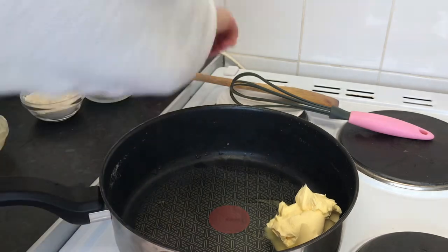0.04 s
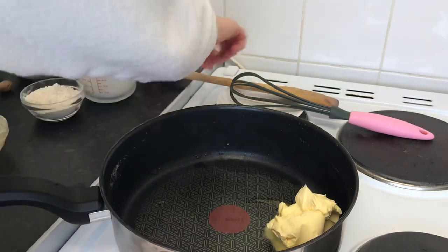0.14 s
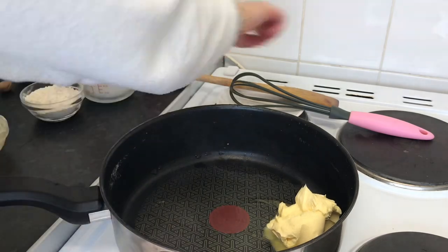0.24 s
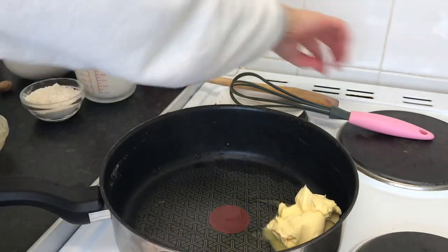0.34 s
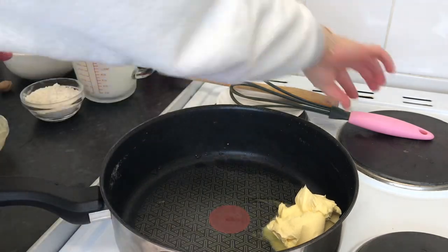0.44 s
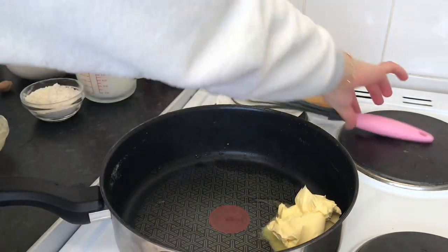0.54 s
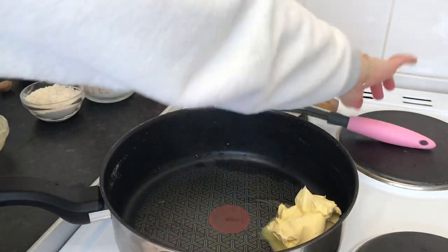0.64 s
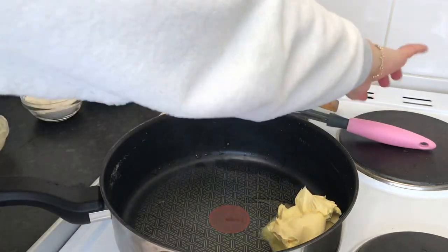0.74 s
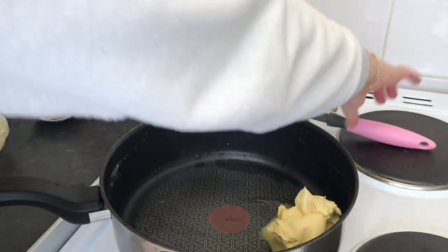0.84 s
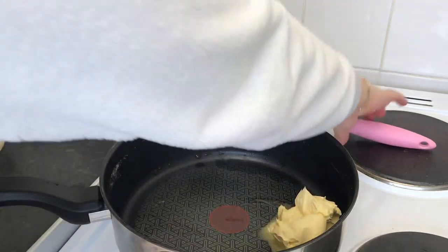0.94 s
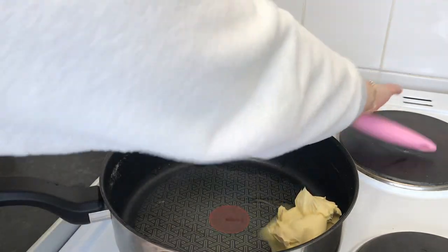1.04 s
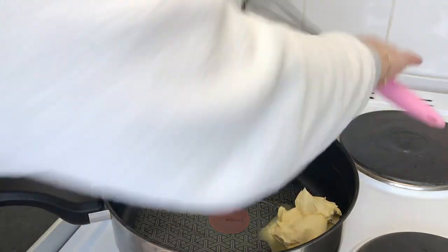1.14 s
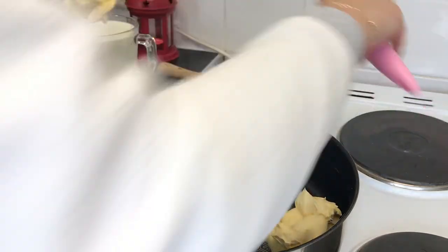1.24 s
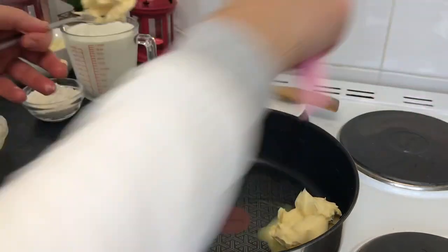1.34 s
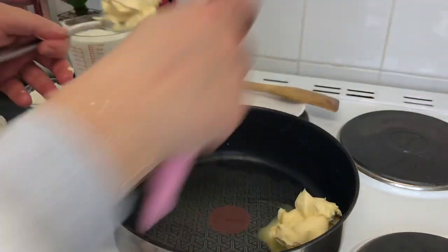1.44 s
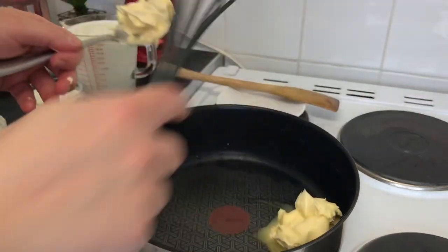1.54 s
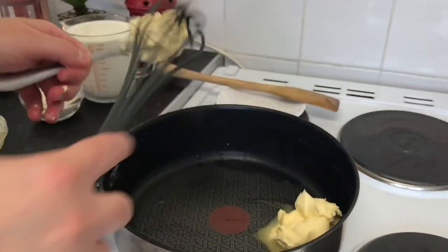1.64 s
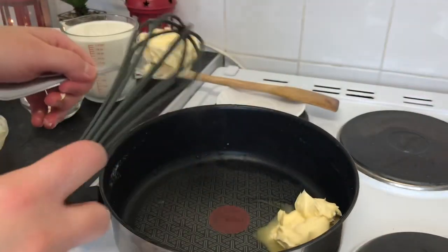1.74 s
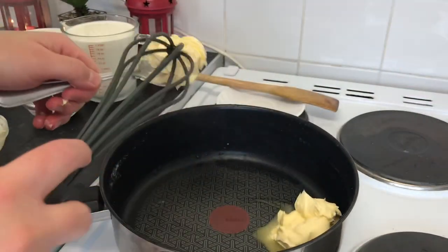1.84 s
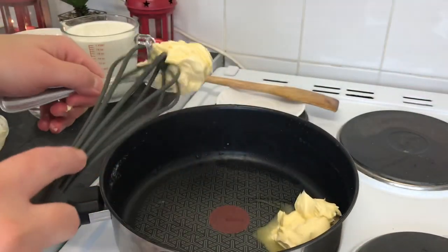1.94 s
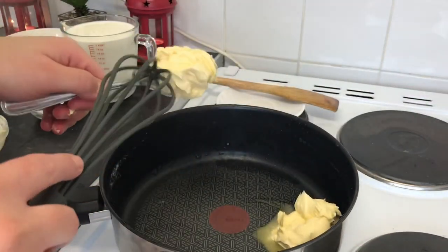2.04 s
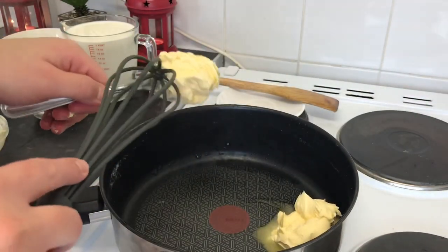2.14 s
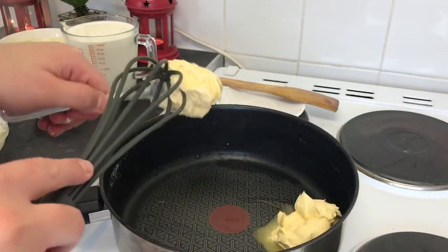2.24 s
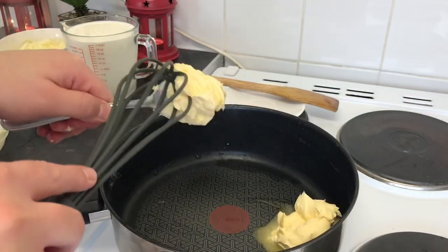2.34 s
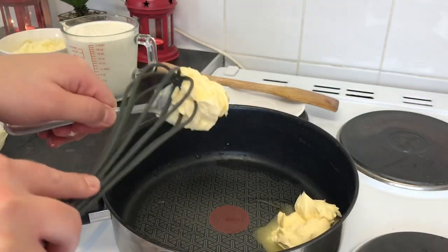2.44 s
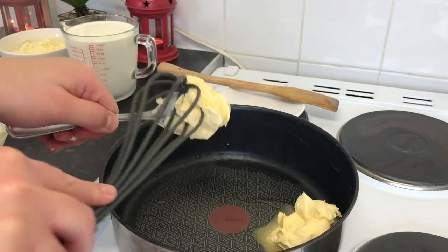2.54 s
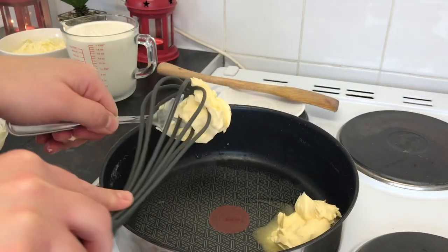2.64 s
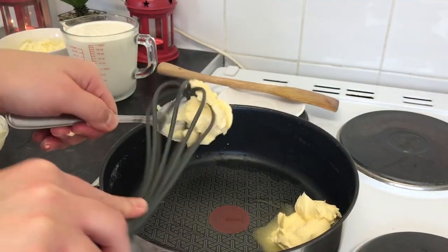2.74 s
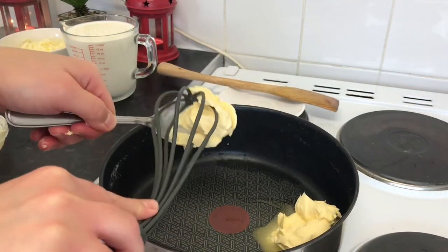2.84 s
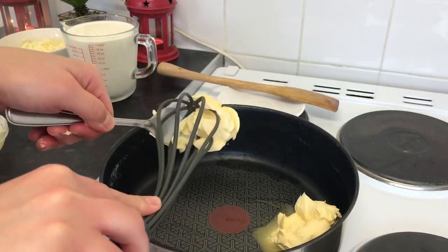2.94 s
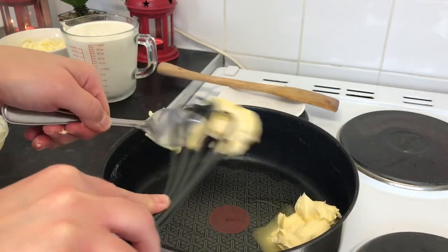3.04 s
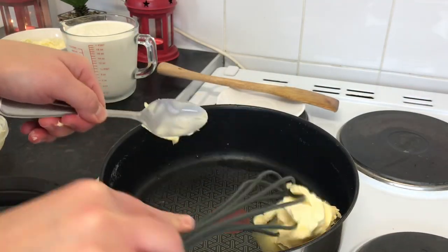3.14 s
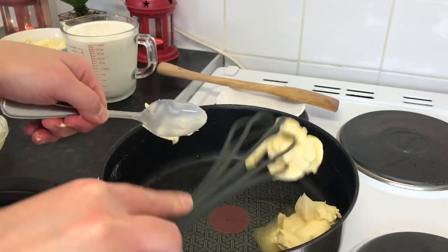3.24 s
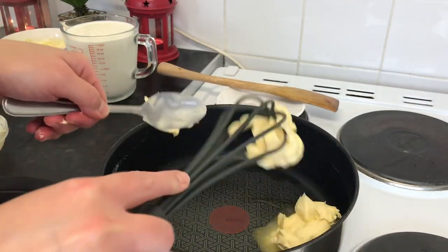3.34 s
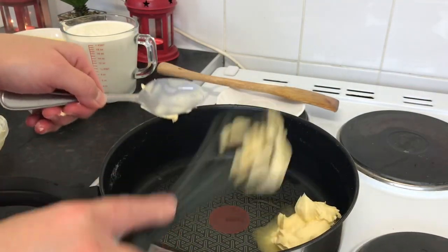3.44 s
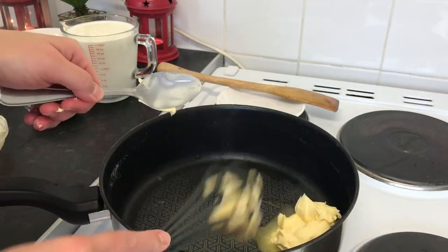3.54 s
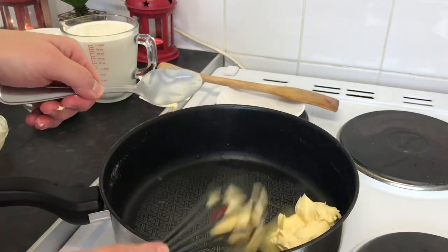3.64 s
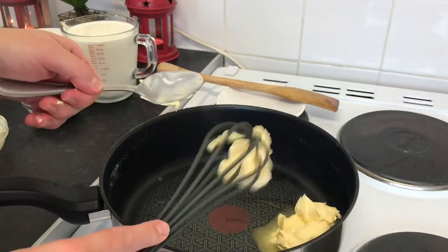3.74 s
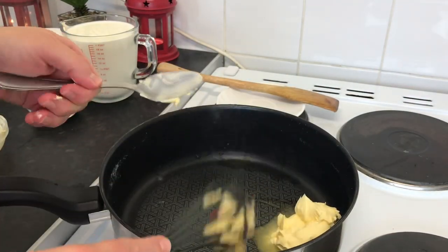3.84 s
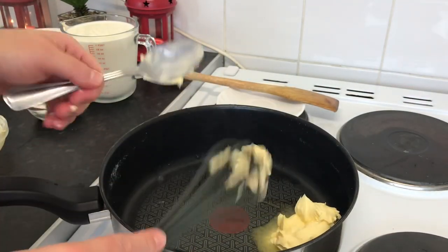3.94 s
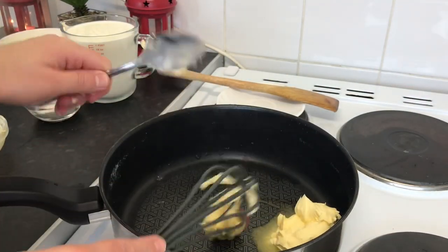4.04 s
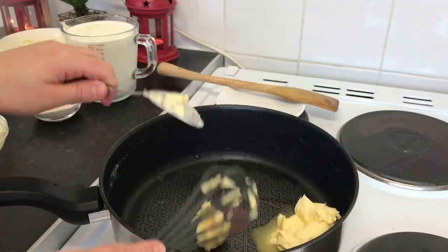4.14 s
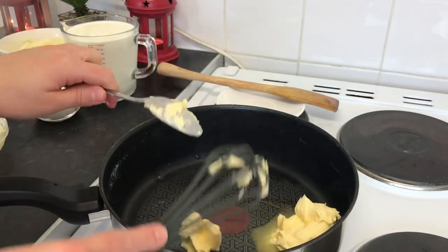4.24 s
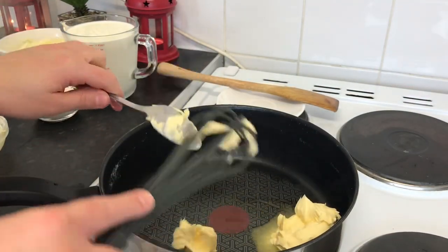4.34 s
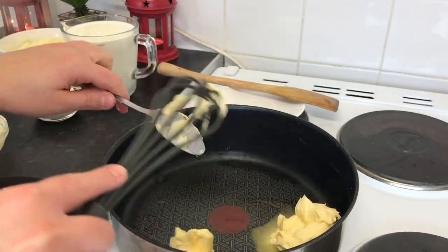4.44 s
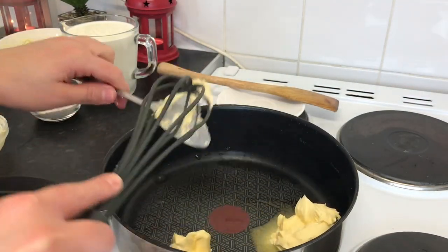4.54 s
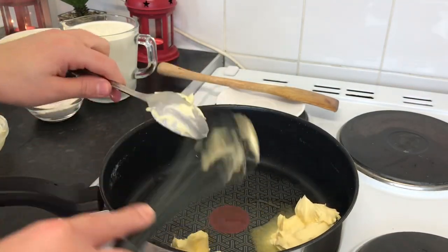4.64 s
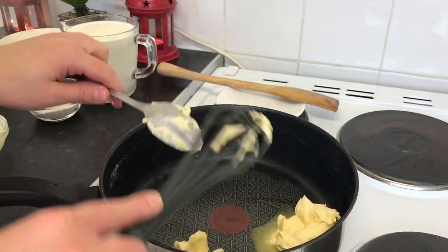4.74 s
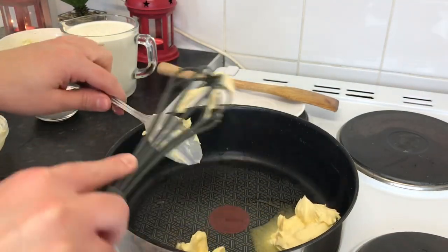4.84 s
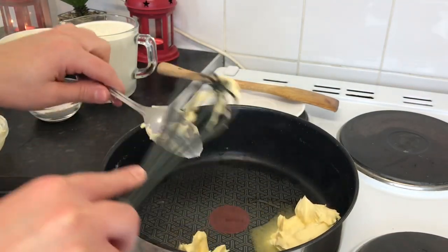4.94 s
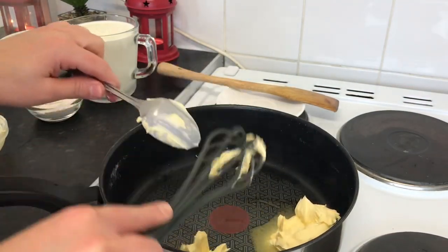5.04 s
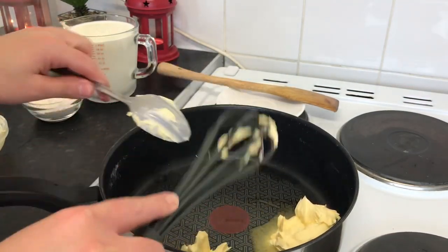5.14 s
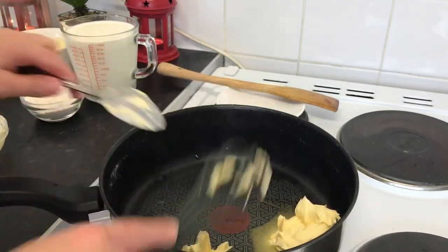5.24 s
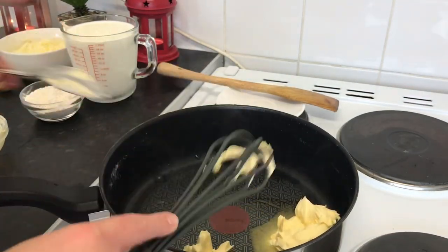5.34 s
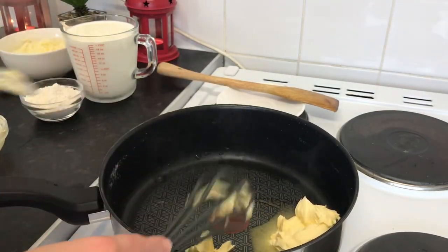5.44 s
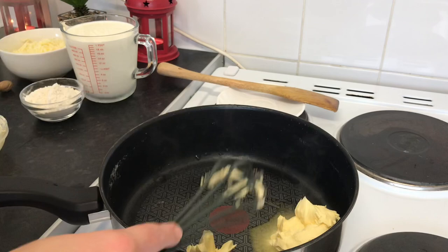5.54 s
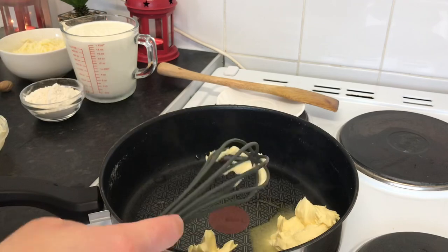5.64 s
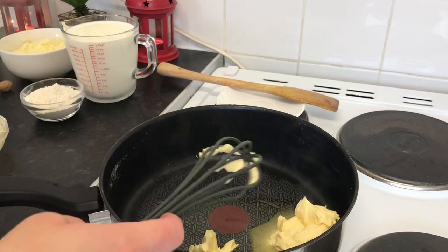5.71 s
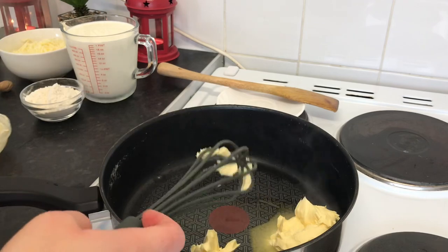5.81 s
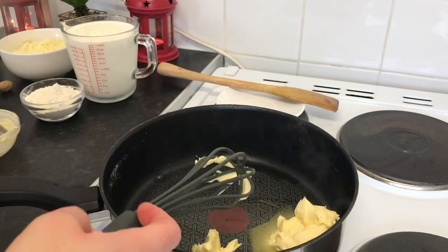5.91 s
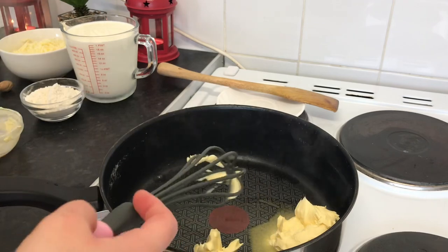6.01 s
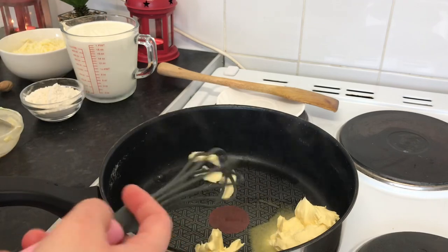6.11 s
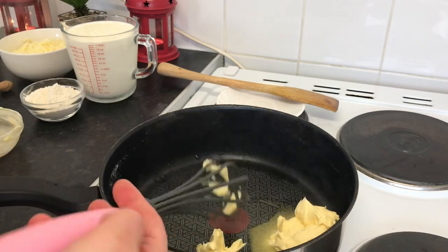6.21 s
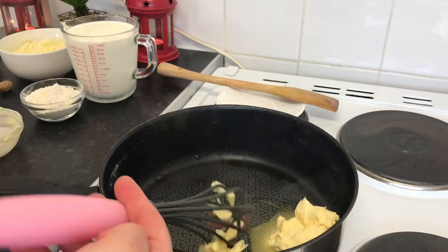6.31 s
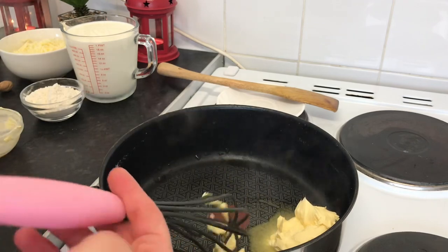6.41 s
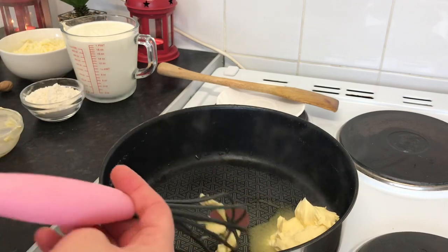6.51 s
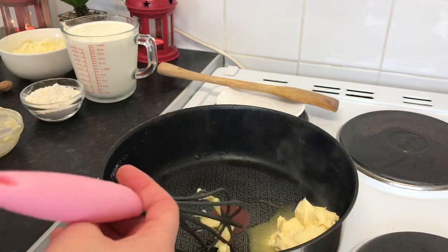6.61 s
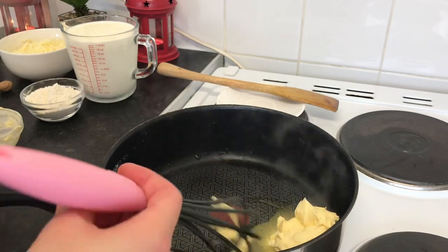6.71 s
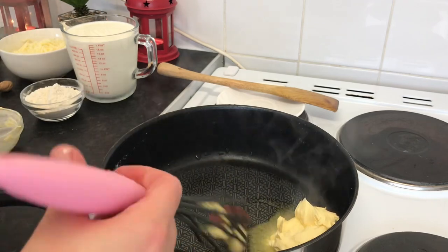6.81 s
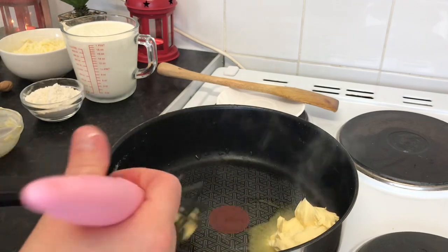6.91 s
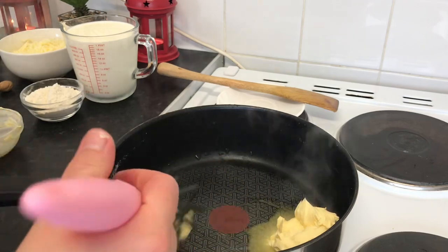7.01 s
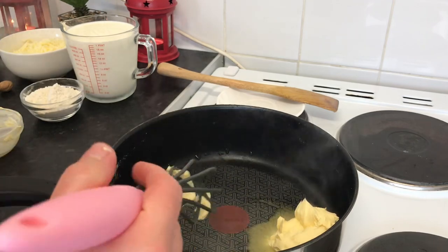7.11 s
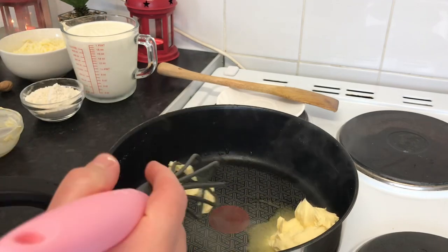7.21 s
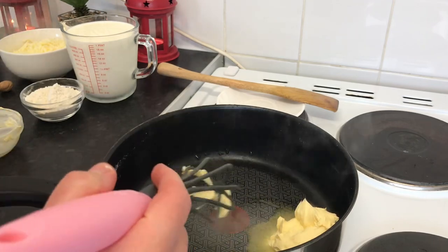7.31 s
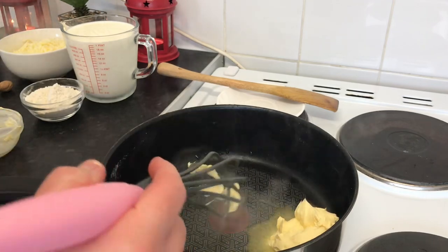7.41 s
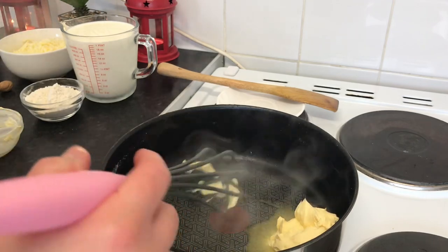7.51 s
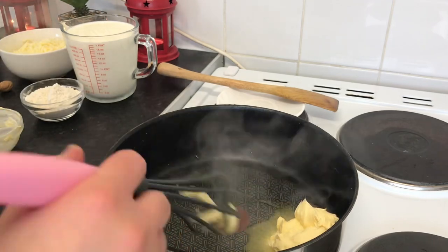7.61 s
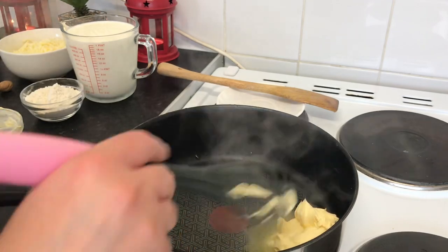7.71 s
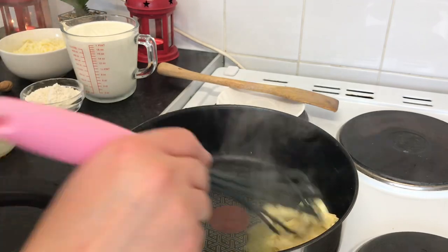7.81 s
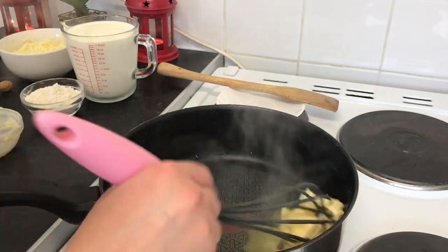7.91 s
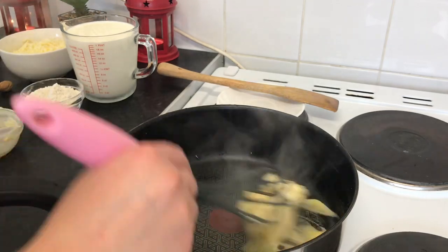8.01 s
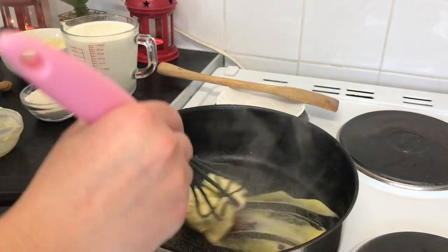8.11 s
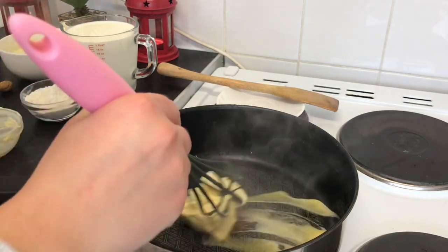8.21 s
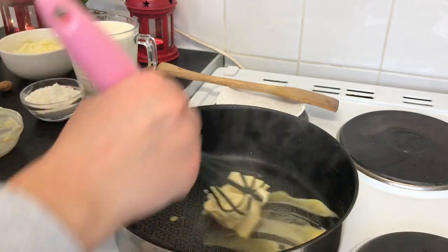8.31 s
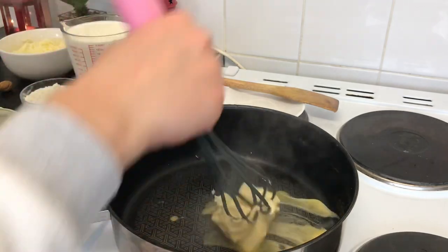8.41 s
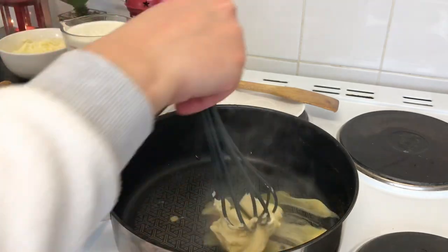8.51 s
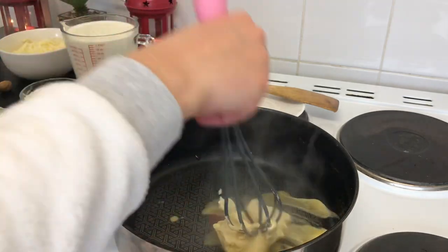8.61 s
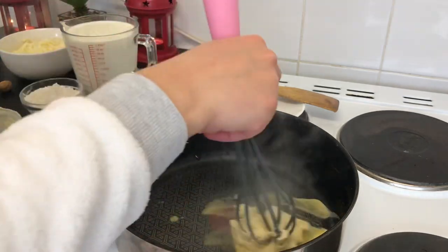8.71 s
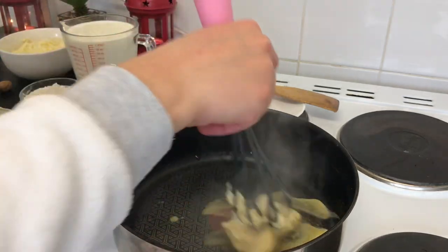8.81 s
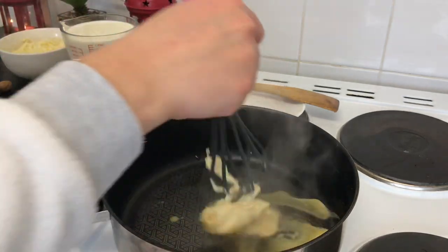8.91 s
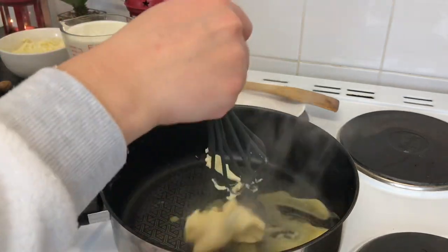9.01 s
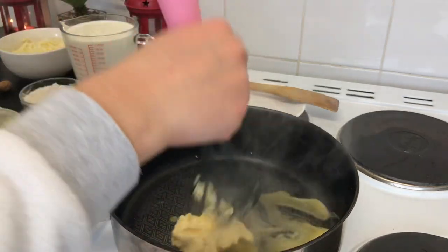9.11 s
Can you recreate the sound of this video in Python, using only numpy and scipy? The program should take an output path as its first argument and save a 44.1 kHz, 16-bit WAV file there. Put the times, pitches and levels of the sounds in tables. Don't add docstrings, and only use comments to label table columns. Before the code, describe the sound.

In a small tiled kitchen, dull spoon knocks give way to sharp metallic whisk taps and a clanging bounce over steadily growing sizzle.

```python
import sys
import numpy as np
from scipy import signal
from scipy.fft import rfft, irfft, next_fast_len
from scipy.io import wavfile
from scipy.ndimage import uniform_filter1d, map_coordinates

SR = 44100
rng = np.random.default_rng(int(sys.argv[2]) if len(sys.argv) > 2 else 0)


def attenuation_scalar(level_db):
    decades = np.asarray(level_db, float) / 20
    return 10 ** decades


def transcribe(u):
    v = np.clip(np.atleast_2d(u).T, -1, 1)
    q = np.round(v * 32767).astype(np.int16)
    wavfile.write(sys.argv[1], SR, q)


N = 403956


def unit(x):
    return x / np.sqrt(np.mean(x ** 2) + 1e-20)


def along(points, hz):
    f, v = np.transpose(points)
    return np.interp(np.log(hz + 1), np.log(f + 1), v)


def wobble(rate):
    knots = rng.standard_normal(int(N * rate / SR) + 4)
    return map_coordinates(knots, [np.arange(N) * rate / SR])


def hump(t, s, half):
    return np.exp(-((t - s) / half) ** 2)


def filtered(x, response):
    m = next_fast_len(N + SR // 2)
    return irfft(rfft(x, m) * response(np.fft.rfftfreq(m, 1 / SR)), m)[..., :N]


def resonances(modes):
    def response(f):
        return sum((-1) ** k * attenuation_scalar(db) * 1j * f * w / (c * c - f * f + 1j * f * w)
                   for k, (c, w, db) in enumerate(modes))
    return response


def bursts(share, spread_db):
    sizes = attenuation_scalar(spread_db * rng.exponential(size=N))
    return unit((rng.random(N) < share) * rng.standard_normal(N) * sizes)


def ring(modes, t, scale, blur_hz=0):
    x = 0
    for hz, db, t60 in modes:
        wander = np.cumsum(rng.standard_normal(len(t))) * np.sqrt(2 * np.pi * blur_hz / SR)
        tone = np.sin(2 * np.pi * (hz * t + 0.45 * rng.random()) + wander)
        x = x + attenuation_scalar(db + rng.normal(0, 1.25) - 60 * t / (scale * t60)) * tone
    return x / np.abs(x).max()


def add(track, s, x):
    track[round(s * SR):][:len(x)] += x


# (frequency [Hz], level [dB per Hz])
AIR = [(12, -61), (20, -53), (43, -2.5), (90, 3), (202, -9.5), (220, -7.5), (252, 0.5), (275, -6.5),
       (468, -13), (1200, -19.5), (1560, -39), (2640, -120)]
# (frequency [Hz], level [dB rms])
HUM = [(50, -82), (99, -68.5), (199, -69.5), (248, -75.5), (298, -79)]
# (time [s], level [dB rms], half length [s])
SWELLS = [(0.708, -54, 0.065), (1.04, -64, 0.09), (1.7, -67, 0.26), (3.82, -58, 0.063), (4.16, -48, 0.15),
          (4.85, -61, 0.075), (5.167, -59, 0.1), (5.44, -43, 0.058), (5.61, -41.5, 0.095),
          (5.938, -53, .12), (6.337, -60, 0.058), (6.597, -53, 0.055), (6.86, -59, 0.12), (7.4, -61, 0.1),
          (7.62, -63, 0.16), (8.15, -59.5, 0.13), (8.93, -49.5, 0.13)]


def kitchen():
    t = np.arange(N) / SR

    def line(hz, gain):
        return np.sqrt(2) * gain * np.sin(2 * np.pi * hz * t + 0.88 * wobble(6.7))

    third = attenuation_scalar(-71 + 2.5 * wobble(4.02))
    third = third + sum(attenuation_scalar(db - 2.5) * hump(t, s, half) for s, db, half in SWELLS)
    hum = sum(line(hz, attenuation_scalar(db + 0.93 * wobble(5.9))) for hz, db in HUM) + line(150.5, third)
    rush = unit(filtered(rng.standard_normal(N), lambda f: attenuation_scalar(along(AIR, f))))
    return hum + attenuation_scalar(-63) * rush


# (frequency [Hz], t60 [s])
TILES = [(150, 0.81), (1000, 0.41), (5000, 0.21), (14000, 0.029)]


def room(x):
    hz, t, z = signal.stft(rng.standard_normal(SR // 2), SR, nperseg=256)
    fade = attenuation_scalar(-60 * t / along(TILES, hz)[:, None])
    tail = signal.istft(z * fade, SR, nperseg=256)[1]
    delayed = np.pad(x, (200, 0))
    return signal.fftconvolve(delayed, tail / np.linalg.norm(tail))[:N]


def jolts(rows):
    out, t = np.zeros((2, N + SR)), np.arange(SR - 1) / SR
    for s, boom_db, rattle_db, rise, fade in rows:
        for track, db, last in zip(out, (boom_db, rattle_db), (1.9 * fade, fade)):
            strength = attenuation_scalar(db - 18 * (t / last) ** 1.39) * np.clip(t / rise, 0, 1)
            add(track, s, strength ** 2)
    return np.sqrt(out[:, :N])


# (time [s], boom [dB], rattle [dB], rise [s], fade [s])
RUBS = [
    (.662, -59, -41.5, 0.025, 0.26),
    (1.06, -56, -41.5, 0.081, 0.33),
]
# (time [s], boom [dB], rattle [dB], rise [s], fade [s])
SHAKES = [(3.738, -45, -47, 0.044, 0.22), (3.925, -47.5, -44, 0.013, 0.19),
          (4.095, -51, -37, 0.0066, 0.052), (4.12, -42.5, -40, 0.0052, 0.13),
          (4.2, -47.5, -50.5, .03, 0.27), (4.302, -49, -53, 0.02, 0.18), (5.369, -44, -41, 0.04, 0.19),
          (5.53, -42, -38.5, 0.012, 0.27), (5.87, -53, -47, .02, 0.19), (6.47, -58, -49.5, .02, 0.27),
          (8.07, -55, -54.5, .06, 0.22)]
# (frequency [Hz], width [Hz], level [dB])
BOOM = [(74, 21, -5.5), (130.3, 11, 5.5), (141.5, 20, 2.5), (199, 33, -3), (266, 58, -7)]
# (frequency [Hz], width [Hz], level [dB])
RATTLE = [(365, 78, 1), (452, 46, 0), (548, 43, 1.5), (713, 130, 2.5), (870, 290, 0), (1142, 46, 4.5),
          (1350, 360, -6.5), (1970, 200, -4)]
# (frequency [Hz], width [Hz], level [dB])
DRAG = [(172, 42, -7.5), (280, 36, -7), (372, 57, -4.5), (440, 22, 1), (567, 24, 3.5), (640, 120, -8),
        (950, 87, -10.5), (1206, 60, -6.5), (1380, 250, -13), (1780, 150, -9.5)]
# (frequency [Hz], level [dB], t60 [s])
HOB = [(282, -6, .35), (370, -8, .9), (548, -5, .6), (720, -2, .3), (830, -5, .3), (1135, -3, .4)]
# (time [s], length [s], tones (frequency [Hz], level [dB]), share of it spent rising)
BUMP = (1.835, .125, [(262, -55), (175, -61)], .35)


def stove():
    (boom_rub, rub), (boom_shake, shake) = jolts(RUBS), jolts(SHAKES)

    def bodies(f):
        dull = 1 / (1 + (f / 1800) ** 2)
        deep = resonances(BOOM)(f) / (1 + (f / 330) ** 4)
        return np.array([deep, resonances(RATTLE)(f) * dull, resonances(DRAG)(f) * dull])

    grit = bursts(share=0.14, spread_db=2.5)
    boom, rattle, drag = filtered(np.array([rng.standard_normal(N), grit, grit]), bodies)

    s, length, tones, rising = BUMP
    t = np.arange(N) / SR - s
    swell = np.interp(t / length, [0, rising / 4, rising, 1 - rising, 1], [0, .7, 1, .8, 0])
    bump = swell * sum(attenuation_scalar(db + 3) * np.sin(2 * np.pi * hz * t + wobble(30)) for hz, db in tones)

    plates, t = np.zeros(N + SR), np.arange(SR - 1) / SR
    for s, _, rattle_db, rise, _ in SHAKES:
        add(plates, s, attenuation_scalar(rattle_db - 2) * np.clip(t / rise, 0, 1) * ring(HOB, t, 1, blur_hz=8))
    rumble = (boom_rub + boom_shake) * unit(boom) + shake * unit(rattle)
    return rumble + rub * unit(drag) + bump + plates[:N]


# (time [s], peak [dB], t60 [s], tinkle re peak [dB])
SPOON_HITS = [(.645, -49, 0.16, -30), (0.6742, -32, 0.033, -28), (0.6809, -23, 0.032, -30),
              (.688, -35.5, 0.059, -30), (.7, -33, 0.16, -14), (0.707, -38, 0.11, 6.5),
              (1.063, -45, .03, 0), (1.083, -46, 0.1, -24), (1.106, -44, .06, -21), (1.162, -49, .05, -24)]
# (frequency [Hz], width [Hz], level [dB])
SPOON = [(550, 55, -3), (885, 63, -2), (1120, 130, 4), (1460, 260, 1), (2000, 440, -6), (2450, 300, -7.5),
         (3030, 500, -8), (3600, 250, -9.5), (335, 140, -0.5)]
# (frequency [Hz], width [Hz], level [dB])
TINKLE = [(4090, 120, -0.5), (6060, 120, 6), (6100, 40, -17), (8320, 97, 1)]
# (time [s], peak [dB])
CLUNKS = [
    (.6815, -25),
    (1.083, -41),
]
# (frequency [Hz], level [dB], t60 [s])
CLUNK = [(570, -8, .3), (888, -4, .055), (1157, -2, .12), (1270, 0, .07), (1416, -4, .1), (2008, -9, .03),
         (3000, -6, .035), (3483, -9, .035)]


def spoon():
    knocks, t = np.zeros((2, N + SR)), np.arange(SR // 2) / SR
    clunk = np.zeros(N + SR)
    for s, db in CLUNKS:
        add(clunk, s, attenuation_scalar(db) * ring(CLUNK, t, 1, blur_hz=7.1))
    for s, db, t60, tinkle_db in SPOON_HITS:
        chatter = attenuation_scalar(db + 10.5 - 60 * t / t60) * rng.standard_normal(len(t))
        add(knocks[0], s, chatter)
        add(knocks[1], s, attenuation_scalar(tinkle_db) * chatter)
    bodies = lambda f: np.array([resonances(SPOON)(f), resonances(TINKLE)(f)])
    return filtered(knocks[:, :N], bodies).sum(axis=0) + clunk[:N]


# (time [s], peak [dB], top re peak [dB], knock re peak [dB], wires' spread [s])
FLICKS = [(3.176, -26, 4, -12, .0015), (3.739, -14, -11, -21, .004), (3.92, -12, -13, -26, .0025),
          (4.085, -9, -12, -27, .002), (4.259, -20.5, -21, -22, .005), (5.119, -26, -13, -20, .004),
          (5.372, -11.5, -7, -19, .0024), (5.5308, -10, -8, -16, .003)]
# (frequency [Hz], level [dB], t60 [s])
RIM = [(4150, -11, .07), (5490, -5, .06), (5650, -1, .07), (6050, -2, .11), (6330, -7, .14),
       (6600, -9, .09), (6930, 1, .08), (7130, 0, .075), (8200, -4, .06), (9100, -3, .055),
       (10050, -9, .04), (12700, -8, .04), (14900, -10, .04)]
# (frequency [Hz], width [Hz], level [dB])
KNOCK = [(1190, 220, 1.5), (1770, 180, -14), (2880, 270, -1.5), (4060, 200, 6.5)]


def flicks():
    out, knocks, t = np.zeros(N + SR), np.zeros(N + SR), np.arange(SR // 4) / SR
    high = signal.butter(N=4, Wn=[9800, 15500], btype="band", fs=SR, output="sos")
    mid = signal.butter(N=3, Wn=[5350, 7600], btype="band", fs=SR, output="sos")
    for s, db, top_db, knock_db, spread in FLICKS:
        t60 = min(0.067, 28 * spread)
        slaps = t / spread * np.exp(1 - t / spread)
        fade = attenuation_scalar(-60 * t / t60) * (1 - np.exp(-t / (.4 * spread)))
        onset = 1 - np.exp(-(t / (.75 * spread)) ** 2)
        ringing = ring(RIM, t, t60 / 0.052, blur_hz=45) * onset * (1 + .5 * slaps)
        hiss = unit(signal.sosfilt(high, rng.standard_normal(len(t)))) * fade ** 0.95
        chatter = unit(signal.sosfilt(mid, rng.standard_normal(len(t)))) * fade
        slap = 0.9 * ringing / np.abs(ringing).max() + .2 * chatter + 0.65 * attenuation_scalar(top_db) * hiss
        add(out, s, attenuation_scalar(db) * slap)
        add(knocks, s, attenuation_scalar(db + knock_db + 12.0) * fade * rng.standard_normal(len(t)))
    handle = lambda f: resonances(KNOCK)(f) * (1j * f / (900 + 1j * f)) ** 2
    return out[:N] + filtered(knocks[:N], handle)


# (time [s], peak [dB], wall ring re peak [dB], lip ring re peak [dB], decay scale)
BLOWS = [(5.869, -7.5, -1, -25, .7), (5.886, -7.5, -14, -14, .9), (5.907, -17, -10, -25, 1),
         (6.0955, -22, -6, 11, .8), (6.098, -19, -20, -10, .8), (6.103, -25, -8, 10, .8),
         (6.115, -20, -20, -8, .8), (6.472, -23.5, -14, -5, .8), (6.479, -25, -20, -12, .9),
         (6.572, -28, -14, -8, .9), (6.651, -32, -14, -8, 1.1), (6.739, -40, -14, -8, .9)]
# (frequency [Hz], level [dB], t60 [s])
STRIKE = [(533, -6, .13), (560, -12, .12), (928, -5, .16), (978, -1, .4), (1093, -10, .5), (1317, -10, .3),
          (1448, -2, .3), (1560, -7, .28), (1863, -4, .14), (2022, -10, .14), (2150, -8, .13),
          (2490, -9, .12), (2700, -13, .1), (2900, -12, .1), (3031, -11, .12), (3198, -13, .1),
          (3720, -15, .08), (3980, -14, .08)]
# (frequency [Hz], level [dB], t60 [s])
PAN = [(300, -24, .2), (533, -13, .17), (560, -17, .14), (652, -17, .35), (684, -15, .4), (806, -15, .22),
       (928, -14, .2), (978, -6, .4), (1093, -6, .5), (1200, -1.5, .22), (1230, -8, .25), (1317, -10, .36),
       (1380, -12, .3), (1448, -9, .32), (1517, -13, .38), (1560, -11, .28), (1614, -7, .38),
       (1640, -12, .34), (1740, -9, .38), (1800, -13, .3), (1863, -9, .14), (1957, -2, .2), (2022, -6, .14),
       (2083, -10, .16), (2202, -11, .13), (2420, -13, .1), (2660, -14, .1), (2790, -14, .1),
       (2929, -16, .1), (3031, -14, .13), (3198, -11, .1), (3620, -13, .09), (3980, -12, .08)]
# (frequency [Hz], level [dB], t60 [s])
TAP = [(420, -11, .12), (542, -1, .11), (720, -12, .12), (830, -12, .12), (990, -6, .16), (1120, -7, .28),
       (1204, -3, .24), (1260, -6, .14), (1474, -10, .1), (1620, -12, .07), (1870, -6, .08),
       (2030, -6, .08), (2130, -3, .09), (2510, -8, .06), (2630, -11, .06), (2960, -7, .06),
       (3175, -4, .06), (3450, -9, .05), (4130, -10, .05)]
# (frequency [Hz], level [dB], t60 [s])
BOUNCE = [(375, -13, .14), (554, -3, .07), (790, -6, .14), (974, -5, .2), (1200, -6, .2), (1314, -4, .16),
          (1443, -9, .2), (1669, -11, .12), (1890, -9, .1), (2030, -10, .08), (2650, -5, .07),
          (3171, -7, .07), (3600, -9, .05)]
# (from time [s], modes)
PLACES = [(5.86, STRIKE), (5.88, PAN), (6, TAP), (6.4, BOUNCE)]
# (frequency [Hz], level [dB], t60 [s])
WALL = [(4050, -12, .07), (4390, -6, .08), (4700, -9, .06), (5490, -6, .07), (6420, -7, .07),
        (7410, -7, .16), (8760, -9, .12), (11480, -3, .2), (11590, -3, .13), (11000, -8, .04),
        (12700, -6, .12), (12850, -6, .1)]
# (frequency [Hz], level [dB], t60 [s])
LIP = [(4690, -14, .05), (5810, -9, .05), (6420, -1, .04), (6860, -4, .045), (8200, -10, .05),
       (8620, -7, .07), (8850, -2, .07), (9020, 1, .08), (10900, -11, .04), (11500, -14, .035),
       (13900, -11, .03)]


def blows():
    out, t = np.zeros(N + SR), np.arange(SR // 2) / SR
    band = signal.butter(N=3, Wn=[950, 2500], btype="band", fs=SR, output="sos")
    damping = attenuation_scalar(-60 * (t / .21) ** 3)
    snap = 1 + .45 * np.exp(-t / .005)
    for (s, db, wall_db, lip_db, scale), (next_s, next_db, *_) in zip(BLOWS, [*BLOWS[1:], (N, 0)]):
        left = 1 - 0.7 * (next_db > db - 3) * np.clip((t - next_s + s) / .003, 0, 1)
        modes = [m for start, m in PLACES if start < s][-1]
        low = left * ring(modes, t, scale, blur_hz=3) * damping * snap
        clatter = .1 * unit(signal.sosfilt(band, rng.standard_normal(len(t)))) * attenuation_scalar(-60 * t / (.2 * scale))
        crack_fade = attenuation_scalar(max(wall_db, lip_db) - 60 * t / 0.045)
        crack = 0.07 * crack_fade * np.diff(rng.standard_normal(len(t) + 1))
        high = attenuation_scalar(wall_db) * ring(WALL, t, 0.48) + attenuation_scalar(lip_db) * ring(LIP, t, 0.76)
        add(out, s, attenuation_scalar(db + 3.0) * (1 - np.exp(-t / 0.00004)) * (low + clatter + crack + high))

    def weighting(f):
        gap = 1 - 0.5 * resonances([(760, 320, 0)])(f)
        return gap * (1j * f / (250 + 1j * f)) ** 2 / (1 + (f / 15600) ** 40)

    return filtered(out[:N], weighting)


def side_hiss():
    out, size, per_s = np.zeros(N + SR), 2048, 4
    hz = np.fft.rfftfreq(size, 1 / SR)
    for k, (when, place, wide) in enumerate(rng.random((int(per_s * N / SR), 3))):
        low_hz = np.interp(place ** 1.5, [0, 1], [4200, 13500])
        width_hz = np.interp(wide, [0, 1], [800, 3000])
        inside = (hz > low_hz) & (hz < low_hz + width_hz)
        band = unit(irfft(rfft(rng.standard_normal(size)) * inside, size))
        add(out, (k + when) / per_s, band * np.sqrt(width_hz / 3000) * signal.windows.tukey(size, .75))
    vigour_db = np.interp(np.arange(N) / SR, *np.transpose(VIGOUR))
    return out[:N] * attenuation_scalar(vigour_db - 5.5)


# (time [s], level [dB])
VIGOUR = [(0.0, -48), (0.53, -48), (0.92, -45), (1.25, -46), (1.45, -42.5), (1.76, -43), (2.37, -41.5),
          (4.54, -36.5), (4.85, -36), (5.61, -34), (6.12, -34.5), (6.45, -33), (7.75, -32.5), (8.14, -32.5),
          (8.49, -32.5), (8.83, -34), (9.03, -34.5), (9.16, -33.5)]
# (frequency [Hz], level [dB per Hz])
FIZZ = [(240, -24.5), (400, -19), (899, -18), (1150, -12), (1900, -9.5), (2250, -12.5), (2630, -7),
        (3650, -8), (4330, -2.5), (5910, 2.5), (10300, -3.5), (14800, -0.5), (15700, -0.5), (16500, -45)]
# (frequency [Hz], width [Hz], level [dB])
BOWL = [(710, 72, 9.5), (1148, 140, 6.5), (2284, 21, 6.5), (1874, 260, 6), (2650, 32, 13.5),
        (3210, 32, 4.5), (4110, 1200, 6.5), (5413, 99, 5), (5482, 43, 7.5), (6116, 24, 10), (3870, 200, -3),
        (5030, 83, -6), (7800, 200, 1), (10300, 410, 0.5), (6520, 125, 6), (6920, 240, 3.5),
        (8360, 230, 3.5), (9000, 390, 3.5), (9600, 145, 6.5), (11340, 330, 3.5), (12540, 2100, 4)]
# (time [s], depth [0-1.5])
FOCUS = [(0, 1.1), (3, 1.09), (6, 1.02), (7, 0.85), (8.1, 0.73), (8.5, 0.58), (9.16, 0.32)]
# (frequency [Hz], width [Hz], level [dB])
FILM = [(1160, 87, 2.5), (2500, 220, 2), (4320, 130, -3.5), (8660, 1400, 4), (12700, 900, 0.5)]
SIZE_EDGES = [2550, 3855, 9650]
# (level re vigour [dB], growth with vigour, gain as the fat spreads [dB])
SIZES = [
    (-17.5, 0.76, 5.5),
    (-13.5, 0.76, 3),
    (-1.39, 0.96, -0.2),
    (-6.5, 1.03, 13),
]
# (time [s], half length [s], change per size [dB])
SHADE = (1.405, 0.15, [-2, -2.5, -3, -6])
# (time [s], half length [s], gain per size [dB])
STIRS = [(4.5, 0.12, [0.58, 0.61, 0.98, 1]), (6.714, 0.17, [0.79, 1, 0.22, 0.98]),
         (8.442, 0.16, [0.1, 0.1, 0.8, 1.5]), (8.77, 0.24, [3.2, 4, 0.087, 0.67]),
         (9.1, 0.088, [0.088, 1.2, 0.092, 0.5])]
# (time [s], half length [s], from [Hz], to [Hz], level [dB])
SWEEPS = [(6.5, 0.38, 2620, 2680, 4.5), (8.56, 0.062, 2500, 2650, 9), (8.65, 0.097, 2700, 3100, 5),
          (8.55, .06, 3550, 3650, 7), (7.1, 0.063, 3050, 3400, 3.5), (4.6, 0.62, 6300, 6500, 3),
          (5, .7, 5470, 5470, -1.5), (7.5, 0.66, 3200, 3100, 4.5), (8, 0.35, 2620, 2620, 0),
          (5, 0.11, 4550, 4600, 4), (7.6, 0.13, 4550, 4300, 2), (8.62, 0.13, 2450, 2700, -4),
          (8.85, 0.13, 2650, 2650, -1), (6.725, .02, 2620, 2620, 5), (7.68, .07, 6400, 6000, 8),
          (9.06, 0.084, 2700, 2700, 6.5)]


def sizzle():
    hz, t, z = signal.stft(bursts(share=.9, spread_db=.8), SR, nperseg=1024, noverlap=768)

    def smooth_noise(bins, frames):
        noise = uniform_filter1d(rng.standard_normal(z.shape), bins, axis=0)
        return unit(uniform_filter1d(noise, frames, axis=1))

    patches, drift = smooth_noise(8, 12), smooth_noise(6, 90)
    streaks = smooth_noise(2, 30)

    def peaks(modes):
        return sum(db / (1 + (2 * (hz - c) / w) ** 2) for c, w, db in modes)

    now = np.minimum((t * SR).astype(int), N - 1)
    bowl_db = sum(np.outer(peaks([mode]), 1 + 0.093 * wobble(2.29)[now]) for mode in BOWL)
    focus = np.interp(t, *np.transpose(FOCUS))
    body_db = bowl_db * focus + np.outer(peaks(FILM), np.clip(2 - 2 * focus, 0, 2))
    colour = attenuation_scalar(along(FIZZ, hz)[:, None] + body_db) * (hz < 15900)[:, None]

    above = [1 / (1 + (edge / (hz + 1)) ** 14) for edge in SIZE_EDGES]
    shares = -np.diff([np.ones_like(hz), *above, np.zeros_like(hz)], axis=0)
    vigour_db = np.interp(t, *np.transpose(VIGOUR))
    mean_db = vigour_db.mean()
    nudges = sum(np.outer(dbs, hump(t, s, half)) for s, half, dbs in [SHADE, *STIRS])
    gain = 0
    for share, (db, growth, spread_db), nudge_db in zip(shares, SIZES, nudges):
        part = colour * share[:, None]
        level_db = db + mean_db + growth * (vigour_db - mean_db)
        level_db = level_db + spread_db * (focus.max() - focus) + nudge_db
        gain = gain + attenuation_scalar(level_db) * part / np.sqrt(np.mean(part ** 2, axis=0))

    for s, half, from_hz, to_hz, db in SWEEPS:
        centre_hz = np.interp(t, [s - half, s + half], [from_hz, to_hz])
        pocket = 1 / (1 + (2 * (hz[:, None] - centre_hz) / 210) ** 2)
        gain = gain * attenuation_scalar(db * hump(t, s, half) * pocket)
    flutter_db = 0.77 * patches + 0.97 * drift + 1.5 * np.clip(streaks, 0, 9)
    pops = signal.istft(z * gain * attenuation_scalar(flutter_db), SR, nperseg=1024, noverlap=768)[1][:N]
    return pops * attenuation_scalar(0.31 * wobble(7.7) + 0.27 * wobble(25))


def scene():
    hits = spoon() + flicks() + blows()
    mono = kitchen() + stove() + hits + attenuation_scalar(-10.5) * room(hits) + sizzle()
    return np.array([mono, mono])


def top_cut(x):
    return signal.sosfilt(signal.butter(12, 17040, fs=SR, output="sos"), x)


def record(dry):
    soft = filtered(dry, lambda f: 1 / (1 + (f / 16250) ** 90))
    mix = soft + [[1], [-1]] * side_hiss()
    return top_cut(mix)


dry = scene()
out = record(dry)
transcribe(out)
```